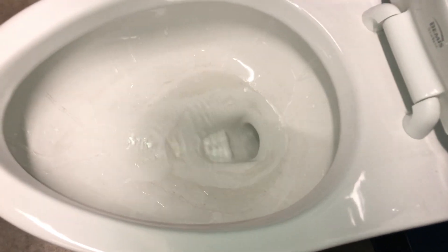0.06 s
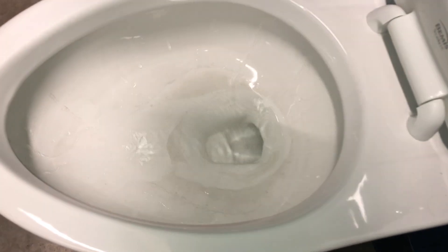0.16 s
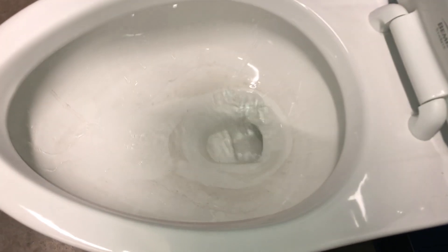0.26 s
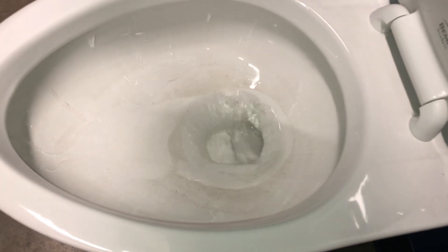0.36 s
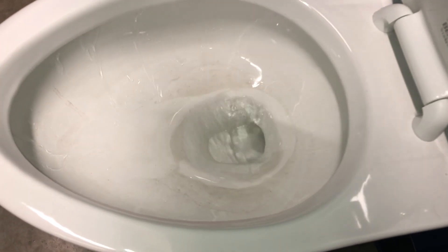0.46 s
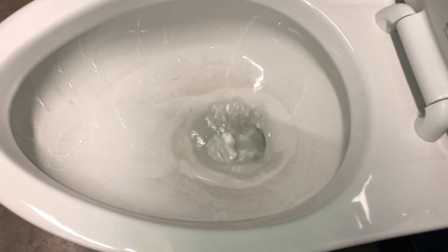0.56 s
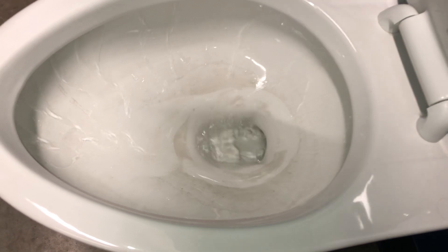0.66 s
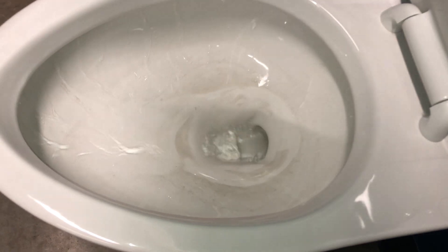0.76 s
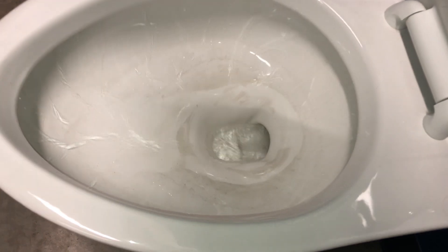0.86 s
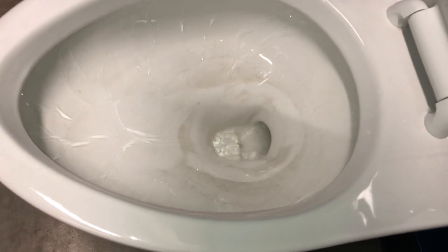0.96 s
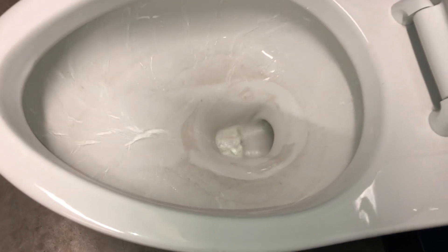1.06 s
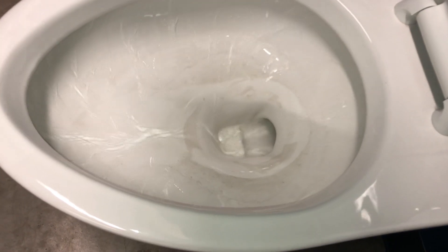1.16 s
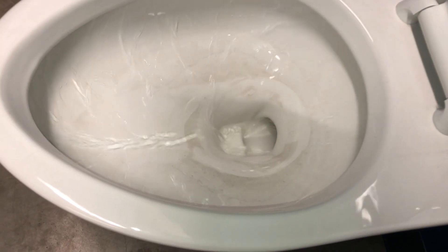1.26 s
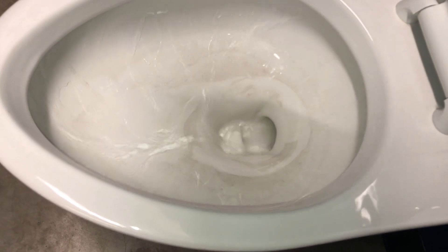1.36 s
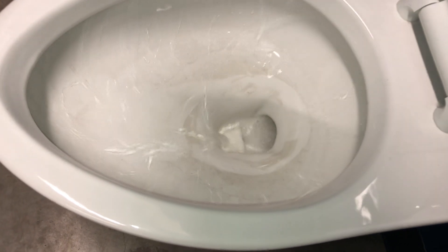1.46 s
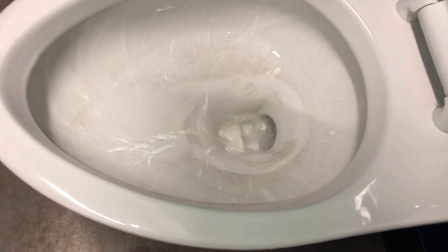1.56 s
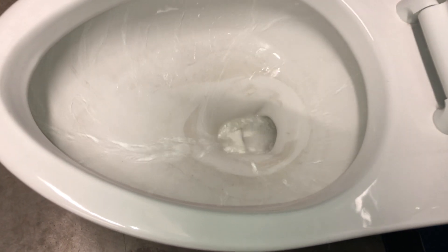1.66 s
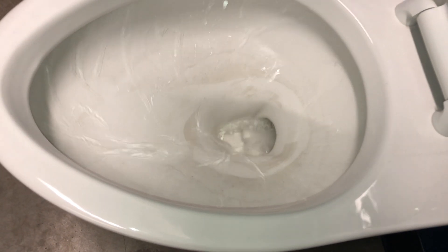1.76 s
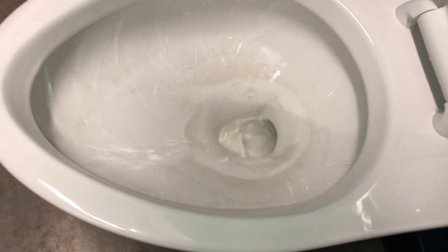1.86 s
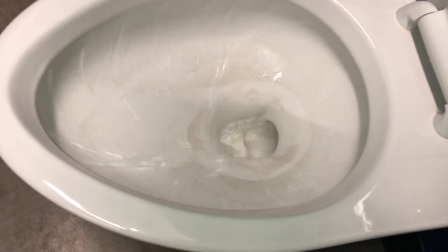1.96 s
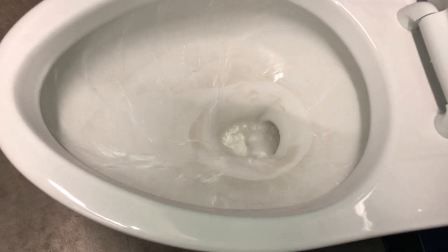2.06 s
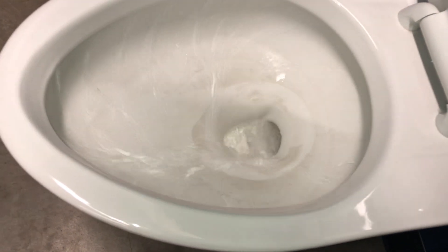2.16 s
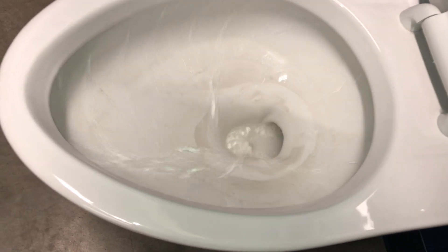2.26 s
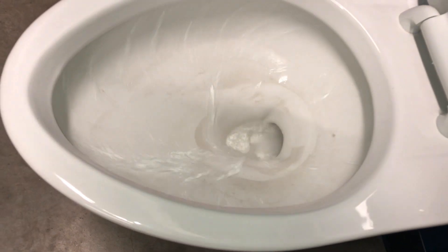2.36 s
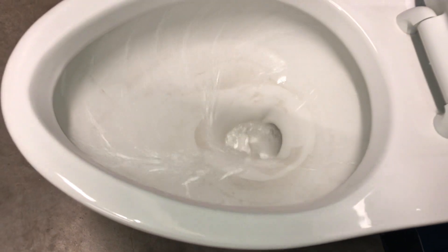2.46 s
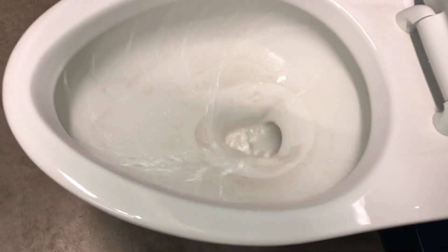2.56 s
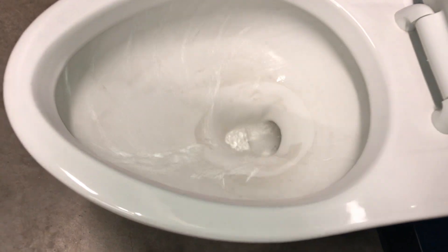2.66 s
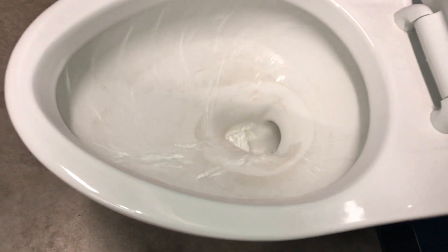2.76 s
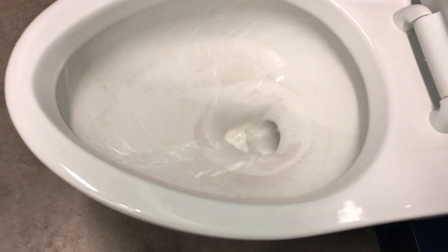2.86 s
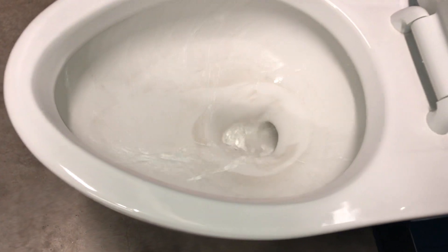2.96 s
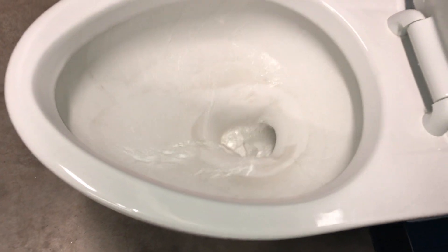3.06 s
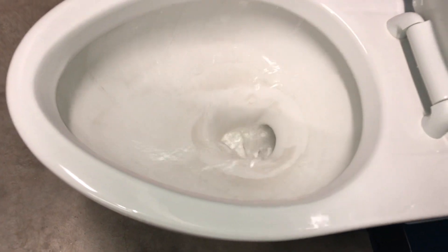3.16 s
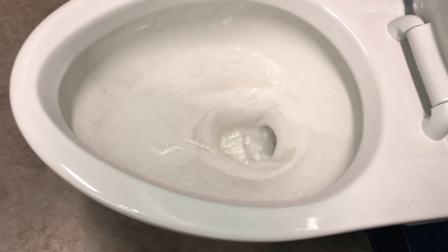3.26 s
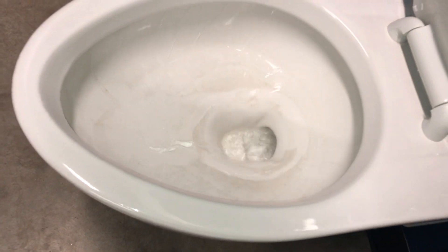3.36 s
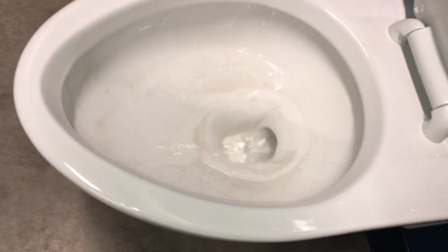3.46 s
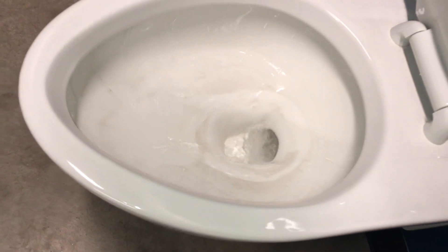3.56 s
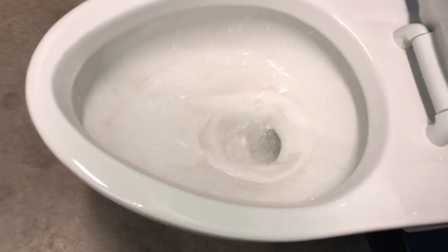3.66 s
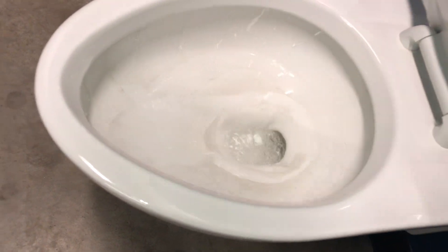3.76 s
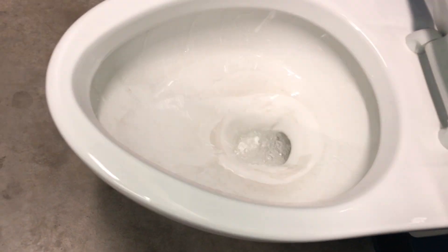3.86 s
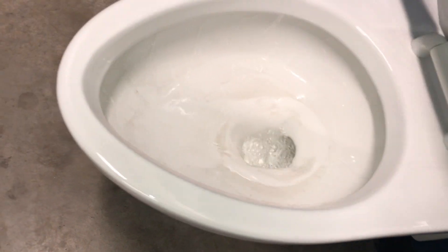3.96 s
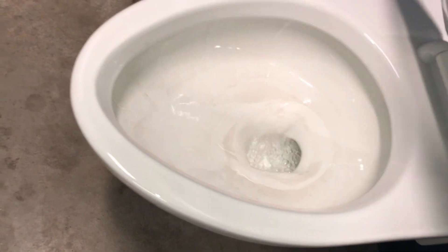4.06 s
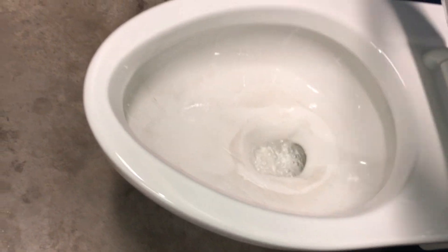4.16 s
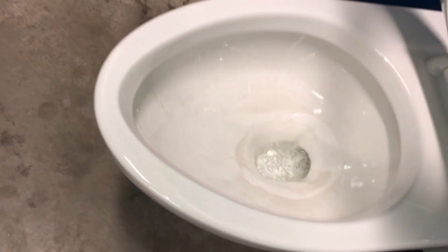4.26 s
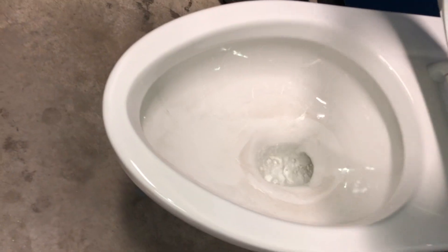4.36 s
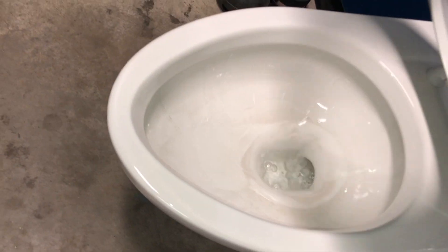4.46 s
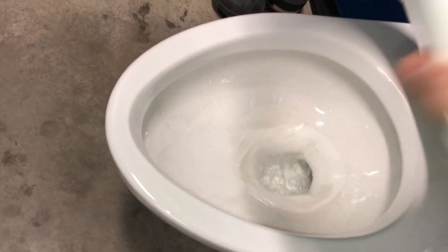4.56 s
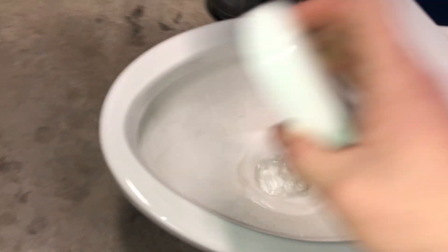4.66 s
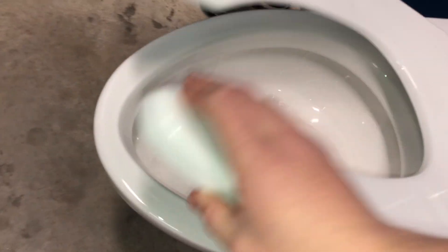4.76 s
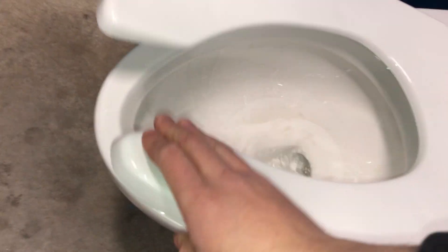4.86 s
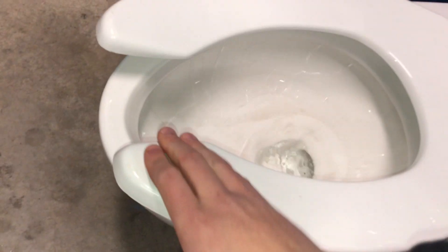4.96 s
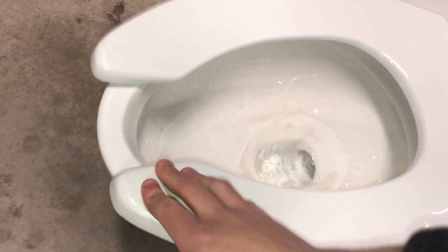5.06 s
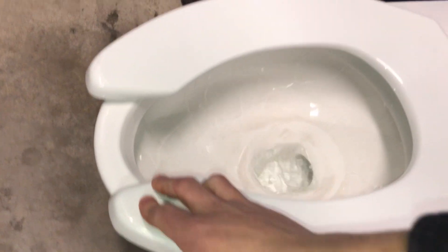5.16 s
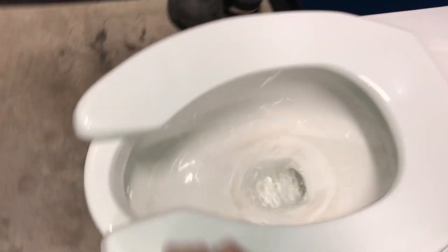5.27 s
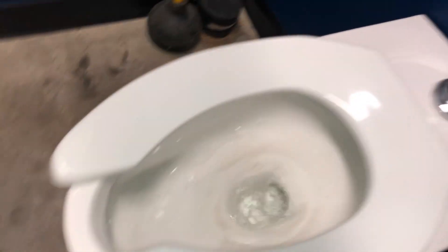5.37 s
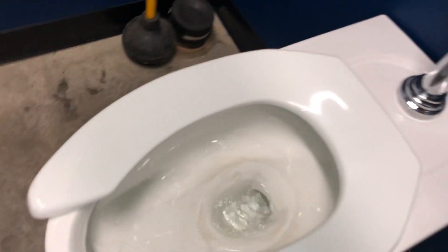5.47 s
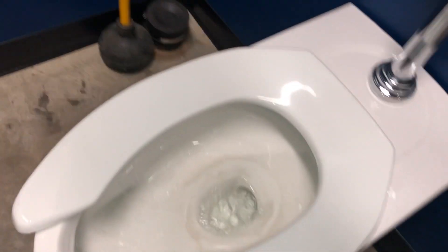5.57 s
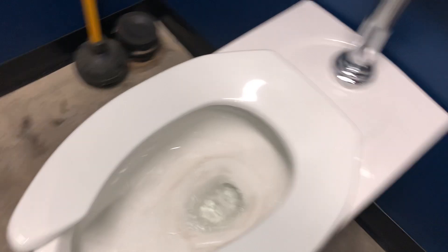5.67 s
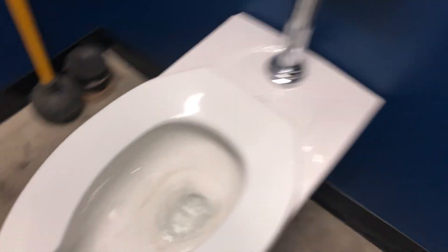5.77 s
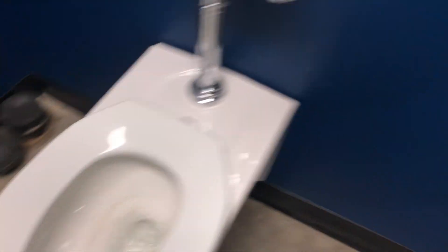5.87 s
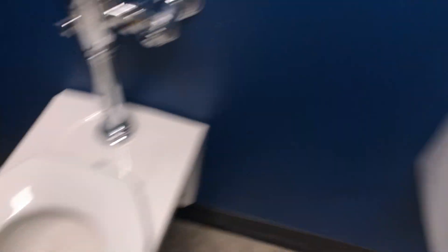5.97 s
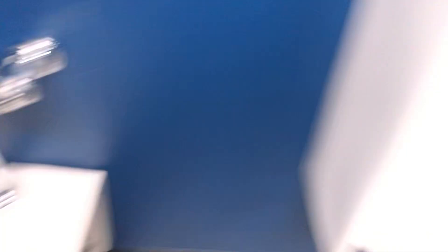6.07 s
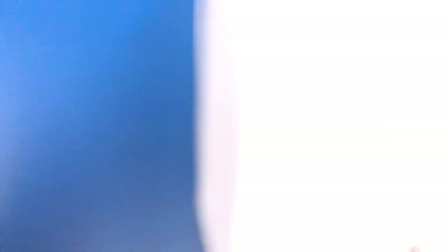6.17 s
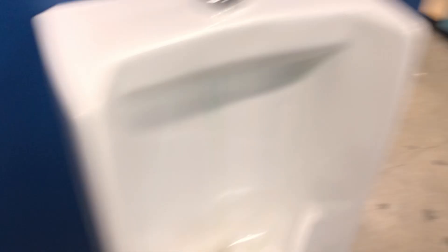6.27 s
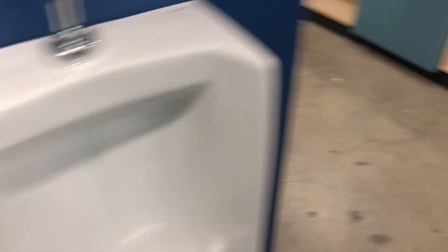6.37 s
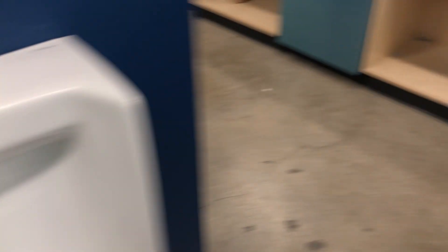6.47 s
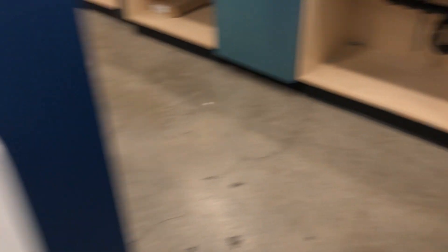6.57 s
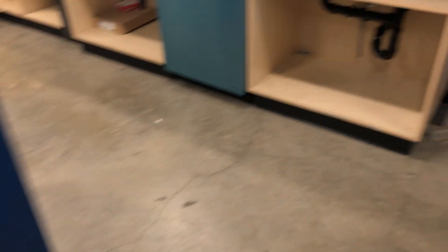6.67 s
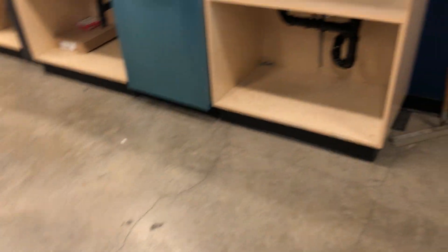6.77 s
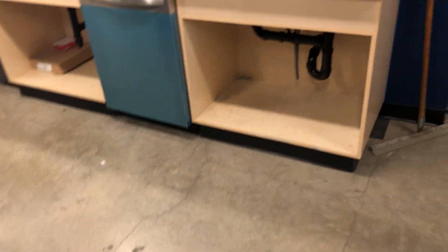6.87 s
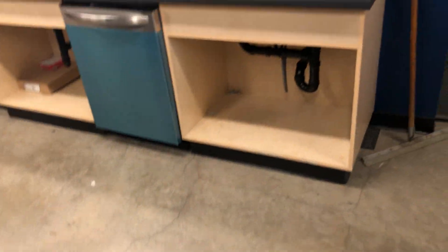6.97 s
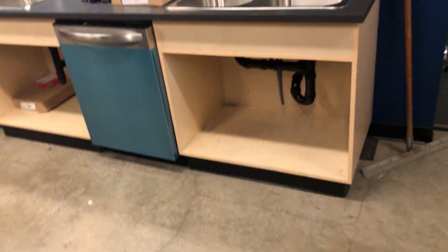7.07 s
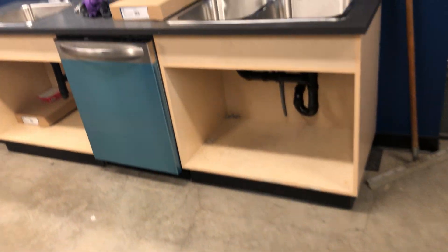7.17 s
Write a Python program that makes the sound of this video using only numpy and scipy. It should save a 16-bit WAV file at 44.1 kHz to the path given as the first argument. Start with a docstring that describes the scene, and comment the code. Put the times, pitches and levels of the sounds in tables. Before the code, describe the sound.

Close above a toilet bowl, water jets hiss and churn, stop abruptly, drip away, then a hard seat bangs on china before quiet ventilation.

```python
"""Water jets roar and splash in the bowl as a flush-valve toilet empties in a hard-walled room, heard from just above.
Shaped noise makes the jet and spray; brief pings make drops and bubbles. The supply pipe throbs and blows air
out of the rim, the siphon gargles, the valve shuts, and the bowl gulps and drips.
Then the plastic seat drops and bounces on the china, as ringing tones and noise cracks.
A sleeve swishes in filtered noise over the steady rush and drone of the ventilation."""
import sys
import numpy as np
from scipy import signal
from scipy.fft import rfft, irfft
from scipy.io import wavfile
from scipy.ndimage import uniform_filter1d

SR = 44100
rng = np.random.default_rng(int(sys.argv[2]) if len(sys.argv) > 2 else 0)


def transcribe(signal):
    """Save signal, clipped to [-1, 1], as a 16-bit WAV file at the path in sys.argv[1]."""
    frames = np.atleast_2d(signal).T
    limited = np.clip(frames, -1, 1)
    pcm = np.round(limited * 32767).astype(np.int16)
    wavfile.write(sys.argv[1], SR, pcm)


N = 318402
TIME = np.arange(N) / SR

# How hard the jet hits; it grows as the pool is sucked away and bares the china.
# Each row: time in seconds, force in dB.
JET_FORCE = [(0, -19), (.72, -8.5), (.83, -9.5), (.95, 0.5), (1.15, 3), (1.55, 0), (2.85, -1.57)]
# Brief surges of the jet. Each row: middle in seconds, half length in seconds, rise in dB.
JET_SURGES = [(1.241, .008, 3.5), (1.465, 0.01, 5), (2.246, 0.0081, 2.5)]
# After the valve, the rim runs dry in ever weaker spills.
# Each row: end in seconds, splash level in dB, spray level in dB.
RIM_SPILLS = [(3.18, -35.5, -37.5), (3.6, -50, -53.5), (4.25, -62.5, -62)]
# The sheet of water breaks up. Each row: time in seconds,
# share of the splash that comes as single drops (0 to 1), drops per second.
SHEET_BREAKUP = [(3.15, 0.22, 1500), (3.3, 0.9, 1200), (3.8, 0.4, 340), (4.4, 0.9, 49)]
# Resonances of the bowl. Each row: pitch in Hz, width to one side in Hz, strength in dB.
BOWL_RESONANCES = [(610, 60, -2.5), (684, 90, 4), (775, 71, -0.5), (1072, 107, 2), (1383, 89, -0.5),
                   (1640, 54, -5), (2270, 46, -5), (3240, 90, -5.5)]
# Spectra of the splash and the fine spray. Each row: frequency in Hz, strength in dB per Hz.
SPLASH_SPECTRUM = [(900, -24), (1500, -10.5), (1950, -1), (4300, 0.5), (8000, -9.5), (16000, -45.5)]
SPRAY_SPECTRUM = [(4700, -29.5), (10000, -0.5), (16000, -0.5)]
# The valve stays open, then shuts; the jet and the supply die away with it.
SHUT_S, SHUT_DB_PER_S = 2.916, 71
SPILL_FALL_DB_PER_S = 155
# Levels when the jet force is 0 dB; the fine spray follows the force only in part.
CHURN_DB, SPLASH_DB, SPRAY_DB, SPRAY_FOLLOWS = -28.5, -25.5, -25, 0.55
# The pool churns on for a while, then settles, with small bubbles plinking in it.
POOL_DB, SETTLE_S, SETTLE_DB_PER_S, PLINK_DB = -45, 3.52, 39, -54


def water():
    """The jet churns in the bowl and splashes on the china; as it thins, hiss turns into ticking drops and plinks."""
    valve = held(SHUT_S, SHUT_DB_PER_S)
    force = gain_of(curve(JET_FORCE))
    surge_db = sum(db * np.exp(-((TIME - s) / half) ** 2) for s, half, db in JET_SURGES)
    jet = valve * force * gain_of(surge_db)

    shut = (1 - valve) ** 2
    spill_splash, spill_spray = shut * together(
        gain_of(dbs)[:, None] * held(end, SPILL_FALL_DB_PER_S) for end, *dbs in RIM_SPILLS)
    pool = shut * held(SETTLE_S, SETTLE_DB_PER_S)

    drop_share = np.clip(curve(SHEET_BREAKUP), 0, 1)
    drops_per_s = curve(SHEET_BREAKUP, axis=2)
    drops = patter(sizes_between(2000, 16000), per_s=drops_per_s, spread_db=5.0, cycles=28)
    drops = evened(room(np.diff(drops, prepend=0), wet_db=-6.5))  # the difference brightens the drops
    hiss = turbulence(patch_db=1.3, flicker_db=1.6)
    sheet = glancing(np.sqrt(1 - drop_share) * hiss + np.sqrt(drop_share) * drops, echo_db=-14.5)

    eddies = turbulence(patch_db=1.7, flicker_db=.8)
    churn_gain = together([gain_of(CHURN_DB) * jet, gain_of(POOL_DB) * pool])
    churn = resonant(eddies, BOWL_RESONANCES) * churn_gain
    splash = tinted(sheet, SPLASH_SPECTRUM) * together([gain_of(SPLASH_DB) * jet, spill_splash])
    jet_spray = gain_of(SPRAY_DB) * force ** SPRAY_FOLLOWS * valve ** 1.5
    spray = tinted(sheet, SPRAY_SPECTRUM) * together([jet_spray, spill_spray])
    plinks = patter(sizes_between(1090, 4300), per_s=99, spread_db=2.0, cycles=51)
    return churn + splash + spray + plinks * gain_of(PLINK_DB) * pool


# The pipe throbs as water fills it. Each row: time in seconds, level in dB.
PIPE_THROB = [(.32, -31), (.47, -34.5), (.6, -30), (1.05, -26.5), (2.3, -30)]
# Resonances of the supply pipe, of the floor shaken by the pipework, of the rim channel and of the rim holes.
# Each row: pitch in Hz, width to one side in Hz, strength in dB.
PIPE_RESONANCES = [(221, 21.6, 0), (292.4, 36.4, 4.5), (389, 51.6, 2.5)]
FLOOR_RESONANCES = [(57, 11, -2.2), (112, 9.5, 0.19)]
RIM_RESONANCES = [(600, 26, 0), (840, 70, -3.5), (1200, 37, -5), (1486, 35, -6), (1775, 25, -2.5),
                  (2086, 32, -4.5)]
HOLE_RESONANCES = [(3530, 66, 3.5), (4430, 470, -2.5), (5610, 210, 2), (10400, 2200, -1),
                   (13300, 1100, 1.5)]
# The trapped air moans, sinking and then rising in pitch.
# Each row: time in seconds, pitch in Hz before a small waver, level in dB before a flutter.
AIR_MOAN = [(.02, 281.2, -25), (.09, 266.8, -33.5), (.14, 235.2, -28), (.33, 211.6, -28.5),
            (.5, 260.4, -53), (.7, 312.8, -23), (.77, 322, -29)]
# Puffs of air ring the rim channel. Each row: start in seconds, level in dB.
AIR_PUFFS = [(0, -34.5), (.114, -33), (.293, -35.5)]
# Air left in the rim channel. Each row: time in seconds, level of its ringing in dB.
RIM_AIR_LEVEL = [(0, -43), (.85, -36)]
# Air spits from the rim holes with the water. Each row: middle in seconds, half length in seconds, level in dB.
AIR_SPITS = [(.12, 0.45, -36.5), (0.49, 0.072, -30), (0.617, 0.092, -28), (0.739, 0.033, -24)]
RUMBLE_DB, PUFF_DECAY_S = -50.5, 0.083
# The waver is a fraction of the pitch.
MOAN_WAVER, MOAN_FLUTTER_DB, MOAN_WAVER_PER_S = .03, 2.5, 30


def supply():
    """Turbulence throbs in the pipe; trapped air moans, and puffs and spits from the rim channel until blown out."""
    pipe = resonant(turbulence(patch_db=0, flicker_db=2.0), PIPE_RESONANCES) * gain_of(curve(PIPE_THROB))
    rumble = resonant(rng.standard_normal(N), FLOOR_RESONANCES) * gain_of(RUMBLE_DB)
    running = (pipe + rumble) * held(SHUT_S, SHUT_DB_PER_S)

    moan_hz = curve(AIR_MOAN, axis=1) * (1 + MOAN_WAVER * wander(MOAN_WAVER_PER_S))
    moan_db = curve(AIR_MOAN, axis=2) + MOAN_FLUTTER_DB * wander(MOAN_WAVER_PER_S)
    turns = np.cumsum(moan_hz) / SR
    moan = np.sin(2 * np.pi * turns) * gain_of(moan_db)
    moan = moan * held(AIR_MOAN[-1][0], SPILL_FALL_DB_PER_S)

    puffs = resonant(rng.standard_normal(N), RIM_RESONANCES) * jolts(AIR_PUFFS, PUFF_DECAY_S)
    # the steady air stirs only the lower resonances
    steady_air = resonant(rng.standard_normal(N), RIM_RESONANCES[:4]) * level(RIM_AIR_LEVEL)
    spit_gain = together(swell(*row) for row in AIR_SPITS)
    spits = resonant(turbulence(patch_db=0.0, flicker_db=4.0), HOLE_RESONANCES) * spit_gain
    return running + moan + puffs + steady_air + spits


# The siphon takes air. Each row: time in seconds, level in dB.
GARGLE_CURVE = [(.84, -19.5), (1, -23), (1.13, -26.5), (1.35, -40)]
# The siphon snatches more air. Each row: middle in seconds, half length in seconds, level in dB.
AIR_SNATCHES = [(2.233, 0.02, -31), (3.59, 0.018, -37)]
# The last water sloshes in the trap. Each row: middle in seconds, half length in seconds, level in dB.
TRAP_SLOSHES = [(3.349, 0.58, -52.5), (3.88, 0.078, -51), (4.19, 0.078, -55.5)]
# Smaller bubbles join in as the air pocket opens.
GARGLE_S_PER_OCTAVE, GARGLE_IN_BOWL_DB = 0.043, -10.5


def trap():
    """The siphon swallows air in a swarm of bubbles, large ones first; later the last water froths in the trap."""
    pitches = sizes_between(405, 1500)
    starts = GARGLE_CURVE[0][0] + GARGLE_S_PER_OCTAVE * np.log2(pitches / pitches[0])
    swarm = patter(pitches, per_s=2200, spread_db=3.5, cycles=30, starts=starts)
    swarm = evened(swarm + gain_of(GARGLE_IN_BOWL_DB) * resonant(swarm, BOWL_RESONANCES))
    air = level(GARGLE_CURVE) + together(swell(*row) for row in AIR_SNATCHES)

    froth = patter(sizes_between(1316, 3100), per_s=700, spread_db=2.5, cycles=40)
    froth = evened(froth + resonant(froth, BOWL_RESONANCES))
    draining = froth * together(swell(*row) for row in TRAP_SLOSHES)
    return swarm * air + draining


# Pockets of air bursting in the bowl and trap.
# Each row: start in seconds, level in dB, starting pitch in Hz, seconds to die away by 60 dB.
AIR_GULPS = [(0.015, -15.5, 275.4, 0.17), (.116, -29, 883, 0.15), (.294, -27.5, 608, 0.4),
             (.815, -19.5, 295, 0.3), (2.229, -20.5, 1017, 0.14), (3.258, -24, 48, 0.18),
             (3.352, -24.5, 51.7, 0.13), (3.408, -30.5, 755, 0.048), (3.561, -30, 1022, 0.16),
             (3.577, -24.5, 756, 0.043), (3.608, -29.5, 1230, 0.031), (3.866, -42.5, 658, 0.4)]
# Slaps of water and single drips. Each row: start in seconds, peak in dB before the room, pitch in Hz.
WATER_DRIPS = [(3.231, -31, 3150), (3.2625, -30, 5040), (3.431, -31, 4860), (3.516, -32.5, 3660),
               (3.53, -33, 13000), (3.578, -30.5, 7800), (3.674, -40, 3700), (4.0164, -43, 5105),
               (4.181, -33, 4680), (4.223, -41, 3500), (4.5377, -43.5, 4470), (4.569, -41.5, 9200),
               (4.927, -44, 5100)]


def gurgles():
    """Large air pockets burst as ringing bubbles; slaps and drips tick as short bursts of noise around a pitch."""
    out = np.zeros(N)
    for s, db, hz, t60 in AIR_GULPS:
        add(out, s, gain_of(db) * bubble(hz, t60, rise=0.16))
    t = np.arange(2048) / SR
    for s, db, hz in WATER_DRIPS:
        cavity = signal.butter(2, [hz / 1.15, min(hz * 1.17, SR / 2 - 1000)], "band", fs=SR)
        slap = rng.standard_normal(len(t)) * np.exp(-t / 0.0065)
        tick = signal.lfilter(*cavity, slap) + gain_of(-18) * slap
        add(out, s, gain_of(db) * tick / abs(tick).max())
    return room(out, wet_db=-11.5)


# The seat is grasped, then lands and bounces.
# Each row: start in seconds, ring level in dB, crack level in dB, brightness (upper limit) in Hz.
SEAT_BLOWS = [(4.711, -46, -42, 3960), (5.089, -19.5, -14, 13000), (5.0953, -26, -15, 10100),
              (5.104, -27, -25, 5000), (5.111, -14, -17, 3800), (5.136, -18, -22, 2600),
              (5.178, -18, -31, 1420), (5.201, -37, -42, 450), (5.221, -24, -26, 330),
              (5.253, -29.5, -30.5, 900)]
# Ringing tones (modes) of the seat on the bowl.
# Each row: pitch in Hz, level in dB, seconds to die away by 60 dB.
SEAT_MODES = [(227, -14, 0.46), (300, -4.5, 0.12), (1029, -9.5, 0.16), (1120, 3.5, 0.084),
              (1320, -16, 0.13), (1560, -21, .1), (1645, -22, 0.11), (1890, -8.5, 0.2), (2134, -7, 0.055),
              (2260, -14, 0.08), (2500, -21, 0.11), (2830, -19, 0.14)]
# Spectrum of the crack. Each row: frequency in Hz, strength in dB per Hz.
CRACK_SPECTRUM = [(50, -36), (260, -7), (1100, 3.5), (1600, -2), (2200, 0), (3600, -5), (6000, -18.5),
                  (16000, -32)]
# Each blow lands on another spot, so the modes ring in other proportions; the loose hinge roughens the ring.
SPOT_DB, BUZZ_DB, BUZZ_PER_S = 1.8, 1.6, 350


def seat():
    """Each blow cracks and rings the seat until the next contact damps it; its own brightness limit softens it."""
    rings, cracks = np.zeros(N), np.zeros(N)
    t = np.arange(SR // 2) / SR
    modes = np.array([gain_of(db - 60 * t / t60) * np.sin(2 * np.pi * hz * t) * (1 - np.exp(-hz * t))
                      for hz, db, t60 in SEAT_MODES])
    modes[1::2] *= -1  # neighbouring modes swing in opposite senses
    # the crack is brief, but echoes on between the bowl and the floor
    fade = np.exp(-t / .004) + .27 * np.exp(-t / .024)
    next_contact = [row[0] for row in SEAT_BLOWS[1:]] + [TIME[-1]]
    for (s, ring_db, crack_db, bright_hz), stop in zip(SEAT_BLOWS, next_contact):
        ring = gain_of(SPOT_DB * rng.uniform(-1, 1, len(SEAT_MODES))) @ modes
        crack = tinted(rng.standard_normal(len(t)), CRACK_SPECTRUM) * fade
        damping = np.exp(-np.maximum(s + t - stop, 0) / 0.00099)  # touching the china again stops the ring
        softness = signal.butter(2, min(bright_hz, SR / 2 - 1000), fs=SR)
        add(rings, s, signal.lfilter(*softness, gain_of(ring_db) * ring * damping))
        add(cracks, s, signal.lfilter(*softness, gain_of(crack_db) * crack))
    buzzing = rings * gain_of(BUZZ_DB * wander(BUZZ_PER_S))
    return room(buzzing, wet_db=-17) + room(cracks, wet_db=-11.5)


# The bowl and its pipework shudder on after the seat lands.
# Each row: pitch in Hz, width to one side in Hz, level in dB, seconds to die away by 60 dB.
FIXTURE_SHUDDER = [(55, 41, -41.5, .8), (2180, 250, -46, 1)]


def shudder():
    """The landing seat shakes the whole fixture: a low thud and a faint, dense ring of filtered noise."""
    since = TIME - SEAT_BLOWS[2][0]
    out = np.zeros(N)
    for hz, width, db, t60 in FIXTURE_SHUDDER:
        fade = (since > 0) * np.exp(-np.log(1000) * abs(since) / t60)
        out += resonant(rng.standard_normal(N), [(hz, width, 0)]) * gain_of(db) * fade
    return out


# Strokes of the sleeve. Each row: middle in seconds, half length in seconds, level in dB,
# hiss in dB relative to that level, centre of the hiss in Hz.
SLEEVE_STROKES = [(5.476, 0.056, -51.5, -1.5, 8900), (5.62, 0.038, -59, 6.5, 12500),
                  (5.75, 0.014, -51.5, 1.5, 11500), (5.836, 0.034, -42, -4.5, 10500),
                  (5.901, 0.028, -52, 10.5, 13400), (6.625, 0.053, -46.5, -10, 9500)]
# Folds of the sleeve snap. Each row: start in seconds, level in dB.
FOLD_SNAPS = [(5.652, -52), (6.429, -50), (6.505, -48)]
# Spectrum of rubbing cloth. Each row: frequency in Hz, strength in dB per Hz.
CLOTH_SPECTRUM = [(500, -2.5), (2050, 11.5), (4200, 11.5), (7000, 2), (16000, -7)]
HISS_WIDTH_HZ, SNAP_DECAY_S, SNAP_HZ = 8400, 0.032, 2000


def sleeve():
    """Cloth catches and slides over cloth in short strokes, each with its own noise hiss; a few folds snap."""
    strokes = together(swell(s, half, db, order=4) for s, half, db, *_ in SLEEVE_STROKES)
    hiss = np.zeros(N)
    for s, half, db, hiss_db, hz in SLEEVE_STROKES:
        hiss += resonant(rng.standard_normal(N), [(hz, HISS_WIDTH_HZ, 0)]) * swell(s, half, db + hiss_db)
    snaps = jolts(FOLD_SNAPS, SNAP_DECAY_S)
    catching = turbulence(patch_db=2.5, flicker_db=2)
    rubbing = tinted(catching, CLOTH_SPECTRUM) * (strokes + snaps)
    tap = resonant(rng.standard_normal(N), [(SNAP_HZ, 300, 0)]) * gain_of(-6) * snaps
    return room(rubbing + hiss + tap, wet_db=-10.5)


# Spectrum of the rushing air. Each row: frequency in Hz, strength in dB per Hz.
VENT_SPECTRUM = [(25, -47), (45, 6.5), (90, 4), (135, -2.5), (260, 3.5), (430, -6), (3700, -25),
                 (8000, -37), (16000, -41.5)]
# Resonances of the air ducts. Each row: pitch in Hz, width to one side in Hz, strength in dB.
DUCT_RESONANCES = [(146.5, 35, 1), (210, 10, 7)]
# Each row: time in seconds, rush of air in dB, drone of the ducts in dB.
VENT_CURVE = [(5.7, -46, -55), (6.1, -48, -54), (6.7, -45.5, -49)]


def ventilation():
    """Dull noise makes a steady rush of air; noise in the duct resonances drones louder toward the open room."""
    rush = tinted(rng.standard_normal(N), VENT_SPECTRUM) * gain_of(curve(VENT_CURVE, axis=1))
    drone = resonant(rng.standard_normal(N), DUCT_RESONANCES) * gain_of(curve(VENT_CURVE, axis=2))
    return rush + drone


# Reverberation. Each row: frequency in Hz, seconds to die away by 60 dB.
ROOM_DECAY = [(200, 0.4), (1000, 0.35), (2300, 0.44), (14000, 0.2)]


def room(x, wet_db):
    """Adds the reverberation of hard walls, each band dying at its own speed."""
    taps = rng.standard_normal(SR) * (rng.random(SR) < .1)
    hz, t, z = signal.stft(taps, SR, nperseg=256)
    decay = gain_of(-60 * t / read(ROOM_DECAY, hz)[:, None])
    tail = signal.istft(z * decay, SR, nperseg=256)[1]
    tail[:round(.005 * SR)] = 0  # no echo in the first 5 ms
    return x + gain_of(wet_db) * signal.fftconvolve(x, tail / np.linalg.norm(tail))[:N]


def glancing(x, echo_db, count=8):
    """Close echoes off the china; their delays drift steadily, so the colour shifts."""
    paths = rng.uniform(.001, .012, (count, 2))  # first and last delay of each echo, in seconds
    echoes = np.zeros(N)
    for k, path in enumerate(paths):
        delay = np.linspace(*path, N)
        echoes += (-1) ** k * np.interp(TIME - delay, TIME, x)
    return evened(x + gain_of(echo_db) * evened(echoes))


def turbulence(patch_db, flicker_db):
    """Noise whose level wanders in time-frequency patches and flickers across all bands."""
    z = signal.stft(rng.standard_normal(N), nperseg=512, noverlap=384)[2]
    patches = uniform_filter1d(rng.standard_normal(z.shape), size=8, axis=0)
    patches = evened(uniform_filter1d(patches, size=12, axis=1))
    flicker = evened(uniform_filter1d(rng.standard_normal(z.shape[1]), size=7))
    z = z * gain_of(patch_db * patches + flicker_db * flicker)
    return evened(signal.istft(z, nperseg=512, noverlap=384)[1][:N])


def bubble(hz, t60, rise):
    """A pocket of air rings, its pitch rising as it nears the surface."""
    u = np.arange(0, t60, 1 / SR) / t60
    turns = hz * t60 * (u + rise * u ** 2 / 2)
    return np.sin(2 * np.pi * turns) * (1 - np.exp(-4 * turns)) * np.exp(-np.log(1000) * u)


def patter(pitches, per_s, spread_db, cycles, starts=None):
    """Drops or bubbles ping at random, each pitch from its own start time; louder ones are rarer."""
    out = np.zeros(N)
    for k, hz in enumerate(pitches):
        at = np.flatnonzero(rng.random(N) < per_s / len(pitches) / SR)
        sizes = gain_of(spread_db * np.minimum(rng.exponential(1, N)[at], 3.5))
        ping = np.sqrt(hz) * bubble(hz, cycles / hz, rise=0.14)
        for s, size in zip(TIME[at], sizes):
            if starts is None or s > starts[k]:
                add(out, s, size * ping)
    return evened(out / np.sqrt(per_s))  # a denser patter is not louder


def sizes_between(low_hz, high_hz, count=32):
    """Pitches spread evenly over the octaves of a range."""
    return np.geomspace(low_hz, high_hz, count)


def resonant(x, peaks):
    """Passes x through steep-sided resonances, at rms 1."""
    hz = np.fft.rfftfreq(N, 1 / SR)
    power = sum(gain_of(db) ** 2 / (1 + ((hz - f) / width) ** 2) ** 2 for f, width, db in peaks)
    return evened(irfft(rfft(x) * np.sqrt(power), N))


def tinted(x, points):
    """Shapes x by a spectrum, at rms 1."""
    hz = np.fft.rfftfreq(len(x), 1 / SR)
    return evened(irfft(rfft(x) * gain_of(read(points, hz)), len(x)))


def read(points, hz):
    """Reads a spectrum or a decay table on a log-frequency axis."""
    f, value = np.transpose(points)
    return np.interp(np.log(hz + 1), np.log(f + 1), value)


def curve(rows, axis=1):
    """One column of a control table at every sample."""
    rows = np.array(rows)
    return np.interp(TIME, rows[:, 0], rows[:, axis])


def level(rows, axis=1):
    """A dB column as a gain that dies away outside its rows."""
    outside = np.maximum(rows[0][0] - TIME, 0) + np.maximum(TIME - rows[-1][0], 0)
    return gain_of(curve(rows, axis)) * np.exp(-outside / .03)


def held(until_s, fall_db_per_s, ease_s=0.012):
    """A gain near 1 that rounds off at until_s and then dies away steadily."""
    return gain_of(-fall_db_per_s * ease_s * np.logaddexp((TIME - until_s) / ease_s, 0))


def swell(middle_s, half_s, db, order=2):
    """A gain that rises to db and falls again in a bell shape; a higher order has steeper sides."""
    return gain_of(db) * np.exp(-abs((TIME - middle_s) / half_s) ** order)


def jolts(rows, decay_s):
    """A gain that jumps at each start by its level in dB and dies away."""
    return sum(gain_of(db) * (TIME >= s) * np.exp(-abs(TIME - s) / decay_s) for s, db in rows)


def wander(per_s):
    """A smooth random curve of rms 1 that turns about per_s times a second."""
    spectrum = rfft(rng.standard_normal(N)) * np.exp(-(np.fft.rfftfreq(N, 1 / SR) / per_s) ** 2)
    return evened(irfft(spectrum, N))


def together(gains):
    """Unrelated sounds add in power."""
    return np.sqrt(sum(g ** 2 for g in gains))


def gain_of(db):
    """Decibels to amplitude."""
    return 10 ** (np.asarray(db) / 20)


def evened(x):
    """Scales to rms 1."""
    return x / np.sqrt(np.mean(x ** 2) + 1e-20)


def add(mix, s, sound):
    """Mixes a sound in at time s."""
    part = mix[max(round(s * SR), 0):][:len(sound)]
    part += sound[:len(part)]


def scene():
    """All sources at one listening point, the same in both channels."""
    mix = water() + supply() + trap() + gurgles() + seat() + shudder() + sleeve() + ventilation()
    return np.array([mix, mix])


def record(dry):
    """Removes the treble above about 15.9 kHz."""
    lowpass = signal.firwin(511, 15900, window=("kaiser", 9), fs=SR)
    return signal.oaconvolve(dry, lowpass[None], "same")


dry = scene()
out = record(dry)
transcribe(out)
```